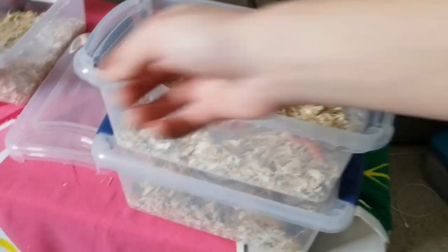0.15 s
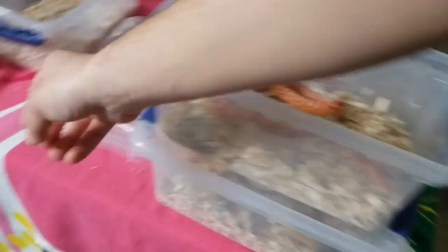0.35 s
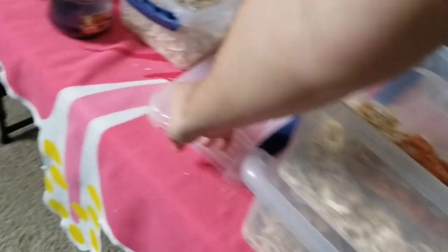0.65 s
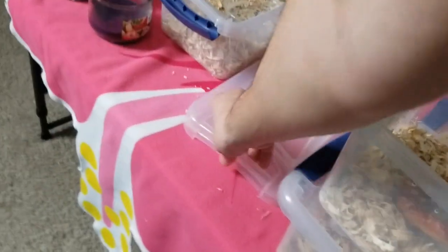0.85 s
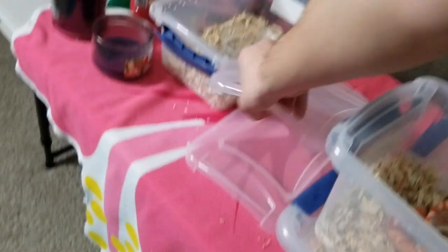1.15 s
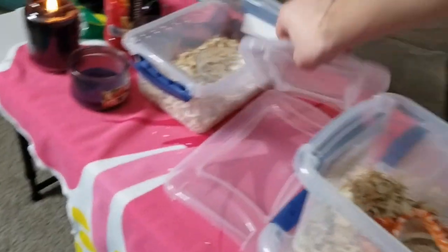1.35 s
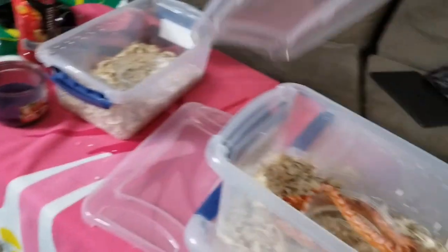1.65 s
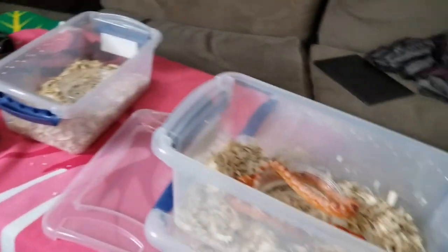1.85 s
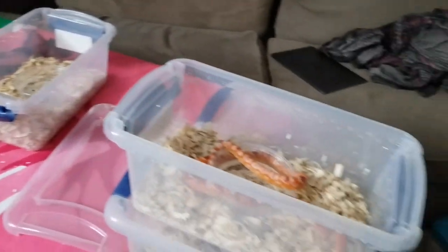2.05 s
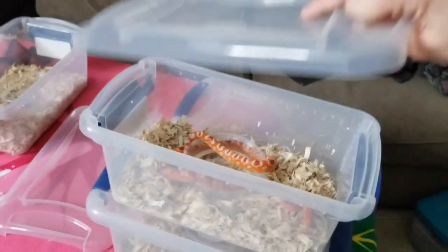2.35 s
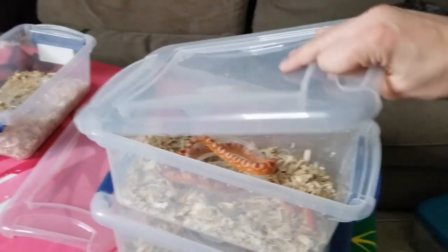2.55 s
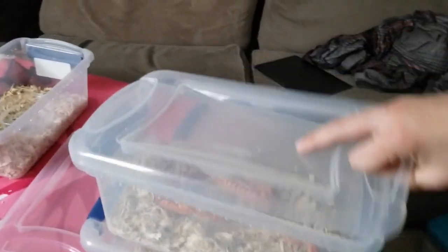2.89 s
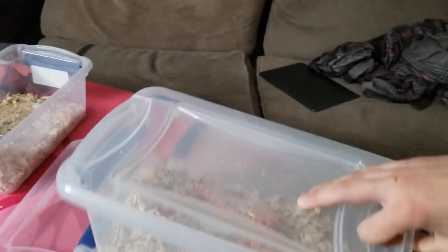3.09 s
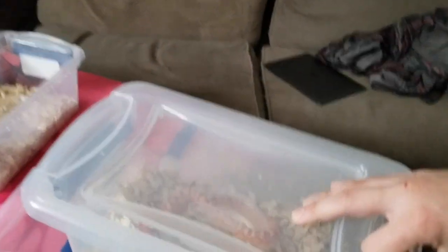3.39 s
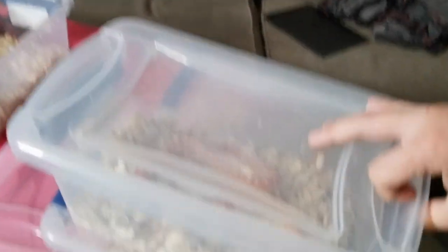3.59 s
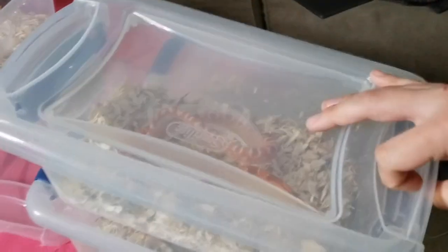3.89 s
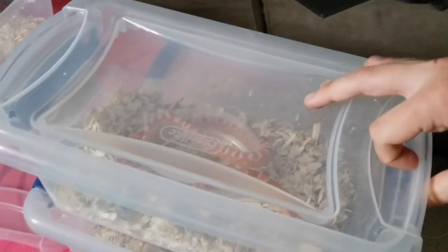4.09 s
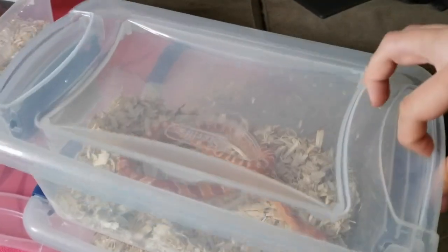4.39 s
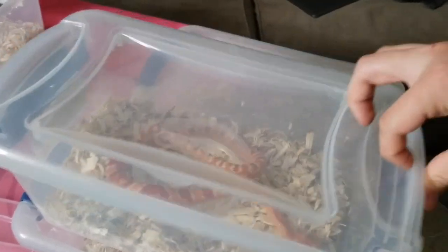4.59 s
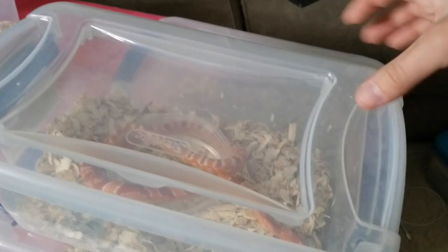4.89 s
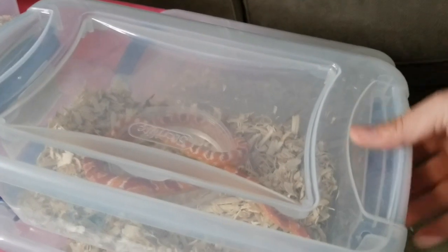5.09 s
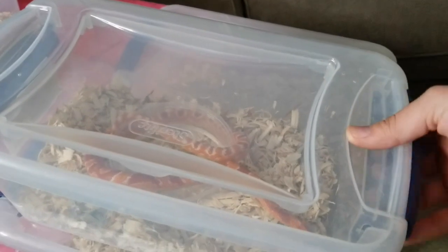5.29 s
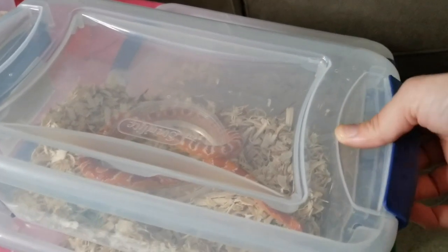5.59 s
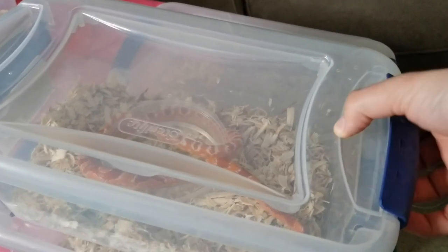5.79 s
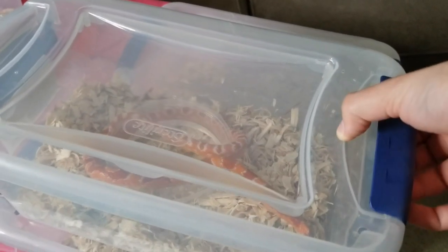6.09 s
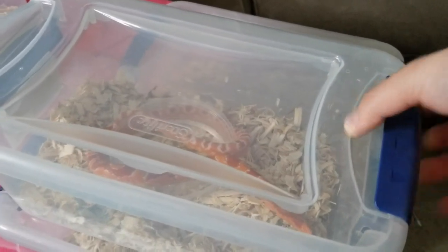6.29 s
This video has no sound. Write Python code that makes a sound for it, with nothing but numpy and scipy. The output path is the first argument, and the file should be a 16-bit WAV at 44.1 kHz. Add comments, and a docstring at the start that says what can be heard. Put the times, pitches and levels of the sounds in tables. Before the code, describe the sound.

Close stereo handling of a thin plastic storage tub in a small furnished room. A spare lid knocks and clatters lightly, then a short lull; the tub's lid lands with clacks and scraping, is pressed on with dull thumps and sharp cracks, and finally a latch snaps with a loud hollow pop. Quiet room tone and low hum beneath.

```python
"""Plastic tub and lid on a table

A plastic storage tub on a cloth-covered table in a small furnished room, handled close to two microphones.
A spare lid is picked up and knocks about; the tub's lid is set down, slid home and pressed on; its latch snaps.
Each blow is a grainy contact shaped by resonances of the thin walls; ticks are its high part, thumps and low
ringing are damped modes, and rubbing and faint hisses are swelling noise. Near echoes and a diffuse tail answer
the blows, over room tone, a steady low hum and narrow bands of faint hiss."""
import sys
import numpy as np
from scipy import signal
from scipy.fft import rfft, irfft
from scipy.io import wavfile
from scipy.ndimage import uniform_filter1d

SR = 44100
rng = np.random.default_rng(int(sys.argv[2]) if len(sys.argv) > 2 else 0)


def int16_out(signal):
    """Quantize to a 16-bit WAV file."""
    q = np.round(np.clip(np.atleast_2d(signal).T, -1, 1) * 32767)
    wavfile.write(sys.argv[1], SR, q.astype(np.int16))


N = 284180  # samples in the scene
SIZE = 8192  # samples in one blow
AGE = np.arange(SIZE) / SR  # seconds since the blow
BINS = np.fft.rfftfreq(SIZE, 1 / SR)  # Hz

# limits of the bands in which blows are levelled: edge_hz
BAND_HZ = [90, 200, 750, 1400, 3000, 8000, 16000]


def amp(db):
    """Decibels to gain."""
    return 10 ** (np.asarray(db) / 20)


def unit(x):
    """Scales to rms 1."""
    return x / np.sqrt(np.mean(x ** 2) + 1e-30)


def read(points, hz):
    """Reads a table on a log-frequency axis."""
    f, value = np.transpose(points)
    return np.interp(np.log(hz + 1), np.log(f + 1), value)


def add(mix, s, sound):
    """Adds a sound to the mix at time s, cut off where the mix ends."""
    start = max(round(s * SR), 0)
    part = mix[:, start:][:, :sound.shape[1]]
    part += sound[:, :part.shape[1]]


def diffuse(pair):
    """Spectra of two unrelated signals, made alike in the bass as at two close microphones."""
    # likeness of diffuse sound at the two microphones: pitch_hz, left_right_correlation
    likeness = [(50, 1), (300, 0.96), (600, 0.41), (1100, 0), (16000, 0.047)]
    a, b = rfft(pair)
    hz = np.fft.rfftfreq(pair.shape[1], 1 / SR)
    same = np.clip(read(likeness, hz), -1, 1)
    left = same * a + np.sqrt(1 - same ** 2) * b
    return hz, np.array([left, a])


def noise(gain):
    """Diffuse stereo noise of rms 1 whose spectrum is gain(hz)."""
    hz, z = diffuse(rng.standard_normal((2, N)))
    return unit(irfft(z * gain(hz), N))


def background(balance_db=1.62, air_db=-55):
    """Room tone as broad steady noise, with a steady low hum and faint hiss as narrow bands of noise."""
    # colour of the room tone: pitch_hz, relative density_db_per_hz
    air_colour = [(15, -33.5), (28, -11), (60, -4.5), (90, -10), (135, -6.5), (195, -7.5), (270, -7.5),
                  (600, -17.5), (950, -28.5), (1700, -32.5), (3200, -39.5), (7300, -34.5), (8600, -50.5),
                  (12300, -36), (16000, -40.5)]
    # steady low hum and narrow bands of faint hiss: pitch_hz, half_width_hz, level_db (rms before the balance)
    narrow_bands = [(88.8, 1.1, -60), (117.6, 5, -61), (1185, 6.7, -74), (2428, 220, -67.5),
                    (7220, 170, -81)]
    air = amp(air_db) * noise(lambda f: amp(read(air_colour, f)))
    hum = 0
    for hz, width, db in narrow_bands:
        hum = hum + amp(db) * noise(lambda f: 1 / (1 + ((f - hz) / width) ** 2))
    return (air + hum) * amp([[-balance_db], [balance_db]])  # left, right


def causal(db):
    """Minimum-phase response with the given gains: nothing sounds before the blow."""
    cepstrum = irfft(np.log(amp(db)))
    cepstrum[1:SIZE // 2] *= 2
    cepstrum[SIZE // 2 + 1:] = 0
    return np.exp(rfft(cepstrum))


def mode(hz, t60):
    """Response of one damped resonance, with peak gain 1."""
    decay = np.exp(-np.log(1000) * AGE / max(t60, .002))
    response = rfft(np.sin(2 * np.pi * hz * AGE) * decay)
    return response / abs(response).max()


def voiced(spectrum, edges, levels_db, span):
    """Smoothly colours a blow so that each band comes close to its level over span seconds."""
    centres = np.sqrt(np.multiply(edges[:-1], edges[1:]))
    for _ in range(2):  # bands overlap, so the second pass refines the first
        power = []
        for lo, hi in zip(edges, edges[1:]):
            band = spectrum[(BINS >= lo) & (BINS < hi)]
            power.append(2 * np.sum(abs(band) ** 2) / (SIZE * span * SR))
        gain_db = levels_db - 10 * np.log10(power)
        spectrum = spectrum * causal(read(np.c_[centres, gain_db], BINS))
    return spectrum


def contact(scrape, grit_db, shiver_db=-5, shiver_t60=0.029, shiver_hz=3000, grit_hz=1100, spread=.0005):
    """A sharp push, a burst of tiny slips, and the duller shiver of the sheet's many modes."""
    t60 = [[max(scrape, .0005) * 2], [shiver_t60]]
    slips, shiver = rng.standard_normal((2, SIZE)) * np.exp(-np.log(1000) * AGE / t60)
    slips = amp(grit_db) * rfft(slips / np.linalg.norm(slips))
    shiver = amp(shiver_db) * rfft(shiver / np.linalg.norm(shiver)) / (1 + 1j * BINS / shiver_hz)
    # low bending waves cross the sheet later than high ones, by spread seconds at grit_hz
    bending = np.exp(-4j * np.pi * spread * np.sqrt(grit_hz * BINS))
    low_cut = (1j * BINS / (1j * BINS + grit_hz)) ** 2
    return bending * (1 + (slips + shiver) * low_cut)


def shell(spread_db=3, bend=0.077):
    """The tub's modes as one blow finds them: the place struck weights them, the grip detunes them."""
    # resonances of tub and lid, before the random changes: pitch_hz, height_db over the bare contact, t60_s
    tub = [(78.4, 3, 0.176), (143.8, 8, 0.15), (303, 3.5, 0.057), (421, 2.5, 0.13), (547, 13.5, 0.075),
           (686, 12, 0.08), (830, 5.5, 0.072), (1054, 10, 0.033), (1213, 3, 0.13), (1553, 4.5, 0.018),
           (1958, 8.5, 0.033), (2530, 7, 0.013), (3304, 7.5, 0.13), (4710, 2, 0.076), (6890, 11, 0.01)]
    chance = rng.standard_normal((len(tub), 2))
    power = 0
    for (hz, db, t60), (weight, detune) in zip(tub, chance):
        ring = amp(db + spread_db * weight) * mode(hz * (1 + bend * detune), t60)
        power = power + abs(ring) ** 2
    return causal(10 * np.log10(1 + power))


def place(s):
    """Lag of the left microphone and room level for a blow at time s."""
    # the hand works its way to the right and nearer the microphones: time_s, left_lag_s, room_db
    path = [(.6, 0.000049, 0), (.85, 0.000067, -5.5), (1.13, 0.00011, -4.5), (2.6, 0.000059, -2.5),
            (3.05, 0.000049, -4.5), (3.8, 0.00011, -7), (4.45, 0.00026, -9.5), (5.3, 0.0002, -10)]
    times, lag, room_db = np.transpose(path)
    return np.interp(s, times, lag), np.interp(s, times, room_db)


def clack(db, hardness, pivot_hz=2050):
    """Band levels of an edge being struck: hardness tilts the colour about the pivot, in dB per octave."""
    # colour shared by every clack: pitch_hz, level_db
    colour = [(950, -1.26), (2050, 1), (4900, -6), (11300, -20)]
    centres = np.sqrt(np.multiply(BAND_HZ[2:-1], BAND_HZ[3:]))
    return db + read(colour, centres) + hardness * np.log2(centres / pivot_hz)


def knocks(wall_db=13, rim_db=7, rim_t60=0.03, low_hz=80, span=0.0095, grit_db=7):
    """Each blow rings the tub's modes, the patch of wall that was struck and the stiff rim beside it."""
    # plastic striking plastic: start_s, clack_db before its colour, hardness_db_per_octave,
    # wall_flex_db, wall_pitch_hz, rim_pitch_hz, contact_s
    strikes = [(0.565, -43, -1, -47, 403, 2120, 0.0039), (0.7022, -47, 1, -41.5, 353, 940, 0.015),
               (0.8456, -46.5, 1.4, -23.5, 399, 1860, 0.0008), (0.8665, -49.5, -1, -50, 285, 1790, 0.0096),
               (0.9924, -47.5, -5, -47, 302, 910, 0.007), (1.12, -30.5, -0.5, -32.5, 259, 890, 0.0041),
               (1.1256, -37, -4.5, -32.5, 360, 790, 0.008), (1.137, -38, 2, -29.5, 380, 1810, .005),
               (2.5138, -32.5, 0, -22, 420, 2080, 0.0013), (2.6945, -48, 6.5, -39, 497, 7200, 0.0094),
               (2.962, -37.5, -1, -24.5, 453, 1030, .004), (2.9937, -33, 4, -21, 410, 4350, 0.0025),
               (3.0634, -33, -1.4, -22, 340, 1620, 0.014), (3.7837, -37, -0.4, -27, 343, 1810, 0.0071),
               (3.8692, -51, -3.5, -37, 323, 1570, 0.0075), (4.4006, -38.5, 1, -22, 433, 1710, 0.006),
               (4.414, -24.5, -2, -18.5, 319, 933, 0.00077), (4.5315, -36, 1.1, -29, 355, 6160, 0.0085),
               (4.571, -42.5, -6, -24.5, 342, 940, .0024), (4.583, -27.5, 1, -20, 368, 3230, 0.0019),
               (5.2425, -32, 5.5, -24, 300, 7600, 0.0053), (5.3509, -44.5, 1.5, -26, 308, 1870, 0.0042),
               (5.612, -49, 5, -37, 328, 4050, 0.024)]
    rock_db = -9.5  # rocking of the whole tub, against the flex of the wall
    brief_t60, t60_per_contact = 0.02, 8.5  # s, s per s: a longer contact keeps the wall ringing
    low_cut = (1j * BINS / (1j * BINS + low_hz)) ** 2
    for s, db, hardness, flex_db, wall_hz, rim_hz, scrape in strikes:
        wall = amp(wall_db) * mode(wall_hz, brief_t60 + t60_per_contact * scrape)
        rim = amp(rim_db) * mode(rim_hz, rim_t60)
        struck = causal(10 * np.log10(1 + abs(wall) ** 2 + abs(rim) ** 2))
        blow = contact(scrape, grit_db) * shell() * struck * low_cut
        levels_db = np.r_[flex_db + rock_db, flex_db, clack(db, hardness)]
        yield s, voiced(blow, BAND_HZ, levels_db, span), place(s)[1]


def scattered(spectrum, width=0.12):
    """What the room hears: the sound of all directions together, whose fine notches fill one another in."""
    # running sum of power from the top down, so each band is a difference of two readings
    total = np.r_[0, np.cumsum(abs(spectrum[::-1]) ** 2)][::-1]
    edges = np.r_[BINS, BINS[-1] + BINS[1]]
    half = abs(width) * BINS + BINS[1]
    band = np.interp(BINS - half, edges, total) - np.interp(BINS + half, edges, total)
    power = band * BINS[1] / (2 * half)
    return causal(10 * np.log10(np.maximum(power, 1e-12)))


def room(send, onset=0.00067, echo_db=0):
    """A few near reflections, and a short diffuse tail that decays at its own rate at each pitch."""
    # decay of the tail: pitch_hz, t60_s
    decay = [(100, 0.7), (300, 0.21), (800, 0.4), (2000, 0.35), (5000, 0.37), (13000, 0.37)]
    # colour of the tail: pitch_hz, level_db
    tail_colour = [(100, 2.5), (300, 3.5), (800, 0.5), (2000, -0.5), (5000, 2.5), (7400, -0.5), (8800, -8),
                   (12500, 4.5), (16000, -9)]
    # near reflections, before dulling: delay_s, level_db
    reflections = [(.0066, -15.5), (0.0134, -8.5), (0.0195, -13), (.0305, -23)]
    t = np.arange(SR // 2) / SR
    hz, z = diffuse(rng.standard_normal((2, len(t))))
    wash = irfft(z * amp(read(tail_colour, hz)), len(t))
    hz, age, z = signal.stft(wash, SR, nperseg=256)
    fading = z * np.exp(-np.log(1000) * age / read(decay, hz)[:, None])
    tail = signal.istft(fading, SR, nperseg=256)[1][:, :len(t)]
    tail = unit(tail * (1 - np.exp(-(t / onset) ** 2))) / np.sqrt(len(t))
    near = np.zeros(len(t))
    for delay, db in reflections:
        near[round(delay * SR)] += amp(db + echo_db)
    near = signal.lfilter(*signal.butter(1, 2500, fs=SR), near)  # cloth and cushions dull the reflections
    return signal.fftconvolve(send, tail + near, axes=1)[:, :N]


def rubs(grain_db=2.0, sway_db=2.5):
    """Rubbing, squeaks and faint hisses: swells of grainy, uneven noise, low where the tub drags on the cloth."""
    # the tub shifting on the cloth: start_s, end_s, level_db (before swell and balance)
    drags = [(0.622, 1.084, -52.5), (2.62, 3.522, -50.5), (3.72, 4.064, -48), (4.269, 4.378, -44.5),
             (4.532, 4.677, -33), (5.097, 5.42, -51)]
    # sliding, squeaking and faint hissing swells: start_s, end_s, level_db (as above), brightest_hz, width_octaves
    swells = [(0.682, 0.824, -57, 900, 1.9), (1.291, 1.49, -59.5, 1460, 0.53),
              (1.45, 1.767, -70, 2900, 0.56), (1.777, 1.913, -54.5, 7000, 9),
              (2.749, 2.987, -50.5, 2050, 2.6), (2.778, 2.926, -53.5, 12400, 0.26),
              (3.0396, 3.0435, -33.5, 2530, 0.16), (3.289, 3.298, -42.5, 5500, 0.28),
              (3.72, 4.066, -69, 4940, 1), (4.825, 4.93, -66, 4500, 0.54), (5.172, 5.37, -57.5, 7300, 0.65),
              (5.581, 5.62, -55.5, 6185, 0.48), (6.154, 6.249, -59.5, 6560, 0.44)]
    drag_hz, drag_octaves = 258, 0.97  # every drag has the same low murmur
    strokes = [(*drag, drag_hz, drag_octaves) for drag in drags] + swells
    out = np.zeros((2, N))
    for start, end, db, bright_hz, octaves in strokes:
        fine, slow = rng.standard_normal((2, SR))
        grain = grain_db * unit(uniform_filter1d(fine, size=40))
        sway = sway_db * unit(uniform_filter1d(slow, size=700))
        hz, z = diffuse(rng.standard_normal((2, SR)) * amp(grain + sway))
        distance = np.log2((hz + 1) / bright_hz) / octaves
        hiss = unit(irfft(z * np.exp(-distance ** 2 / 2)))
        hiss = hiss[:, :max(round((end - start) * SR), 2)]
        add(out, start, amp(db) * hiss * signal.windows.tukey(hiss.shape[1], .8))
    return out * amp([[-2], [1]])  # left, right


def ticks(low_hz=700, span=0.0037, room_db=-4, scrape=0.011, grit_db=8):
    """Light contacts stir only the high modes of the rim: a steep low cut takes the body away."""
    # touches of edges and fingernails: start_s, clack_db before its colour, hardness_db_per_octave
    touches = [(0.7807, -52, -4), (0.9224, -53.5, 0), (1.1088, -46, 1.5), (1.403, -51, 0.5),
               (1.4507, -48.5, 0.5), (1.7917, -52.5, 10.5), (1.862, -57, 6), (1.8817, -56, 8),
               (2.7563, -73, 17), (2.7675, -60.5, 5), (3.0556, -43, 2), (3.3794, -54, 2.5),
               (3.525, -50, -1), (3.7706, -48.5, 1), (3.964, -51, 0), (4.5578, -42, 0), (5.155, -48, -4),
               (5.237, -37, -3), (5.9911, -46.5, 3.5)]
    low_cut = (1j * BINS / (1j * BINS + low_hz)) ** 4
    for s, db, hardness in touches:
        blow = contact(scrape, grit_db) * shell() * low_cut
        yield s, voiced(blow, BAND_HZ[2:], clack(db, hardness), span), room_db


def thumps(soft_hz=600, thud_db=-7, thud_hz=135, level_db=0, room_db=-6):
    """Dull low sounds with no click: one damped mode over a lower thud, both softened."""
    # soft low thumps, and the low ringing that follows some knocks: start_s,
    # peak_db ahead of the microphones, pitch_hz, ring_t60_s
    low_rings = [(0.815, -30, 272, .047), (0.875, -29, 278, 0.066), (0.902, -34, 290, 0.047),
                 (1.128, -26.5, 91.7, 0.33), (1.474, -29.5, 133, 0.079), (2.937, -36.5, 322, 0.026),
                 (3.522, -26.5, 311, 0.027), (3.743, -30, 270, 0.051), (3.771, -23.5, 334, .02),
                 (3.794, -24, 360, 0.18), (3.963, -22, 263, 0.023), (4.303, -31, 360, 0.094),
                 (4.416, -27.5, 90, 0.24), (4.542, -21, 349, .11), (5.131, -25.5, 322, 0.021),
                 (5.165, -27, 312, 0.019), (5.993, -22.5, 325, 0.059)]
    for s, peak_db, hz, ring in low_rings:
        thud = amp(thud_db) * mode(thud_hz, 0.1)
        blow = (mode(hz, ring) + thud) / (1 + 1j * BINS / soft_hz)
        yield s, blow * amp(peak_db + level_db) / abs(irfft(blow)).max(), room_db


def latch(click_db=-41, click_hz=3000, soft_hz=9000, skirt=2.26):
    """The latch lets go all at once: a hollow pop of its modes with a thin click on top."""
    # the latch snapping over the rim: start_s, peak_db ahead of the microphones, room_db
    snap = (6.0014, -1, -9)
    # resonances of latch and rim: pitch_hz, relative level_db, t60_s before the skirts are steepened
    pop_modes = [(145, -6, 0.13), (323, 2, 0.091), (335, 7, 0.035), (450, 0, 0.038), (590, -4, 0.01),
                 (698, -15, 0.043), (825, 3.5, 0.029), (1034, 0.5, 0.0064), (1630, -10, .015),
                 (1950, -4, 0.018), (2450, -11.5, 0.0098), (3870, -19.5, 0.0067), (4730, -29.5, 0.0025),
                 (6440, -17, 0.015), (7450, -22, 0.0016)]
    s, peak_db, room_db = snap
    power = 0
    for hz, db, t60 in pop_modes:
        power = power + amp(2 * db) * abs(mode(hz, t60)) ** (2 * skirt)
    pop = causal(10 * np.log10(power + 1e-7))
    click = amp(click_db) * contact(.003, grit_db=-3) * 1j * BINS / (1j * BINS + click_hz)
    blow = (pop + click) / (1 + 1j * BINS / soft_hz)
    return s, blow * amp(peak_db) / abs(irfft(blow)).max(), room_db


def scene(count=4):
    """Struck sounds reach the right microphone first; they take turns at count differing room responses."""
    # the left microphone faces away from the tub: pitch_hz, left_minus_right_db
    shadow = [(100, -3), (500, -3), (1000, -7), (2000, -4), (4000, -4.5), (8000, -10.5), (15000, -6)]
    direct, sends = np.zeros((2, N)), np.zeros((count, 1, N))
    sides = amp(np.outer([.5, -.5], read(shadow, BINS)))
    fade = 1 - (AGE / AGE[-1]) ** 2
    lead = .001  # s of room ahead of each blow
    blows = [latch(), *knocks(), *ticks(), *thumps()]
    for k, (s, blow, room_db) in enumerate(blows):
        delays = [lead + place(s)[0], lead]  # left, right
        travel = np.exp(-2j * np.pi * np.outer(delays, BINS))
        add(direct, s - lead, fade * irfft(blow * sides * travel))
        add(sends[k % count], s, amp(room_db) * fade * irfft(scattered(blow))[None])
    return direct + sum(room(send) for send in sends) + rubs() + background()


def record(dry, edge_hz=16200):
    """Full-scale limit, then the band limit."""
    band_limit = signal.firwin(511, edge_hz, window=("kaiser", 9), fs=SR)
    return signal.oaconvolve(np.clip(dry, -1, 1), band_limit[None], "same")


dry = scene()
out = record(dry)
int16_out(out)
```